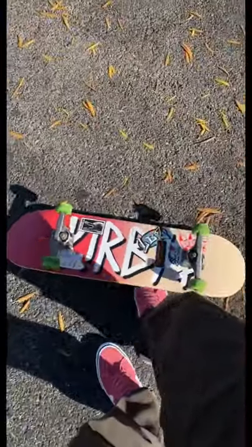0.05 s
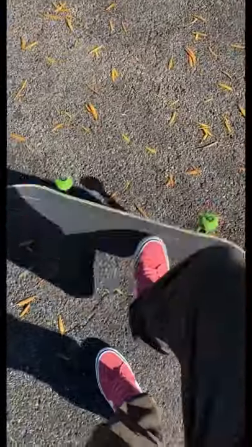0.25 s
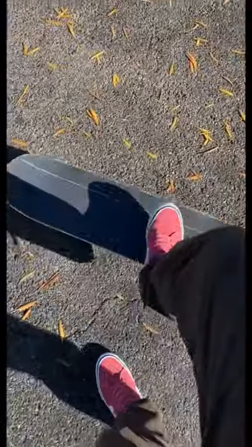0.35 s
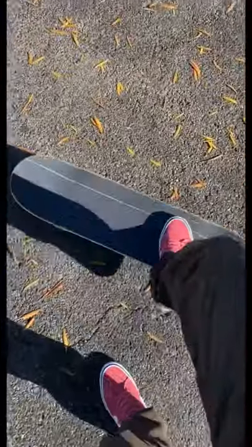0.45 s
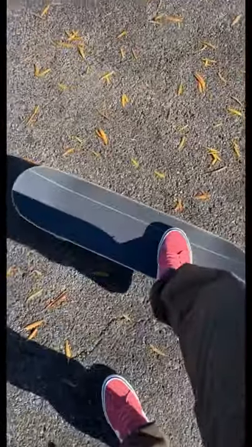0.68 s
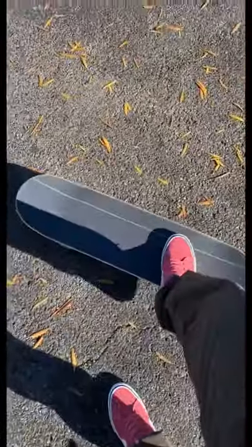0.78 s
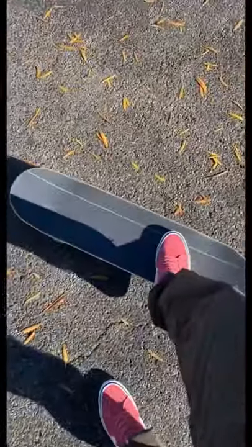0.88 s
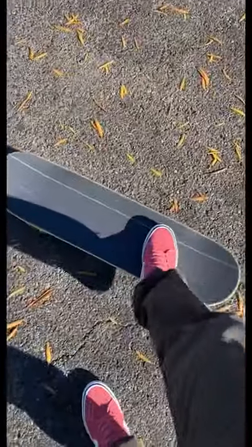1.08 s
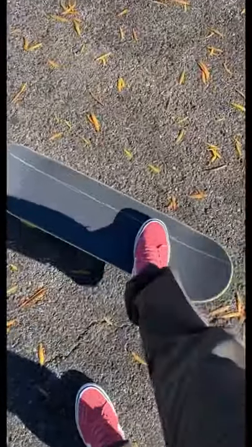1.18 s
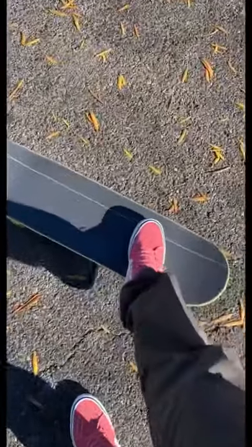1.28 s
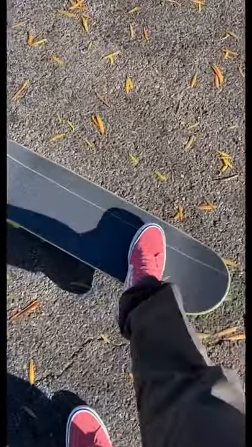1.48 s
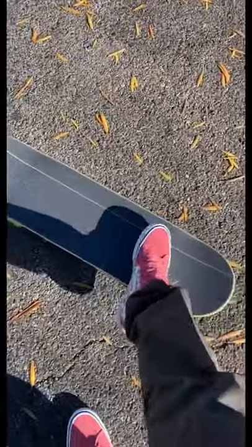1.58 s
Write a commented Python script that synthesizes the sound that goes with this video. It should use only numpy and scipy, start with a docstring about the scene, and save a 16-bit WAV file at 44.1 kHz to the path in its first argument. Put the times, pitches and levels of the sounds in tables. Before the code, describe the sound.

A skateboard lands a flip on asphalt with a loud wooden clatter, then creeps on.

```python
"""Outdoors on asphalt, a hand-held microphone close to a skateboard coming down from a flip.
A shoe scuffs the spinning deck, the wheels slap down, then the rider lands and the wooden board
clatters, loud enough for the gain control to duck everything for a moment. The board creeps on over
grit, its trucks clunking under the rider's weight. Throughout, light wind rumbles on the microphone
and, far off, an insect chirps faintly."""
import sys
import numpy as np
from scipy import signal
from scipy.fft import rfft, irfft
from scipy.io import wavfile
from scipy.ndimage import uniform_filter1d, minimum_filter1d

SR = 44100
rng = np.random.default_rng(int(sys.argv[2]) if len(sys.argv) > 2 else 0)


def pcm_store(signal):
    """Save signal as 16-bit PCM."""
    levels = np.round(np.clip(np.atleast_2d(signal), -1, 1) * 32767)
    wavfile.write(sys.argv[1], SR, levels.astype(np.int16).T)


N = 72765

# blows on the board (time [s], level [dB], knock pitch [Hz], brightness [dB/octave],
# ring length [factor], tick [dB], thump [dB], clack [dB]); the last three are relative to the level
BLOWS = [(0.083, -22.5, 664, 9.5, 1.18, -11, -4, -12), (0.090, -22, 570, -2, 1.8, -19, -26, -27),
         (0.128, -21.5, 570, -7, 1.15, -16, -1, 3.5), (0.1548, -32.5, 1900, 13, 1.06, -4, -13, 3),
         (0.2385, -10, 1170, -3.5, 1.58, -10.5, -5.5, -20), (0.2404, -10, 622, 5.5, 1.19, -8, 7.5, -8),
         (0.244, -16.5, 1235, 2.5, 0.8, -36, 13, -26), (0.319, -23, 615, 3, 1.96, -42, 6.5, -29),
         (0.354, -15.5, 764, 2, 0.95, -30, -9, -19), (0.3608, -13, 515, -9, 1.2, -27, -24, -14),
         (0.374, -15, 550, -3, 0.78, -21, -16, -15), (0.3942, 4.5, 646, -7, 1.04, -27, -15, -23),
         (0.3973, 5.5, 938, 0.5, 1.1, -42, 0.5, -17), (0.4058, 11.5, 514, -2.5, 1.1, -43, -9, -12.5),
         (0.4219, 4, 620, 2.5, 1.9, -24.5, -5, -9.5), (0.4466, 9, 612, -3, 0.93, -38, -6, -15),
         (0.4569, -0.5, 727, 7, 0.66, -40, -17, -5), (0.469, -2, 580, 1, 1.65, -41, -11, -10.5),
         (0.4835, 1.5, 627, 4, 1.1, -43, -7, -14), (0.489, 3, 558, 0.5, 0.81, -37, -27, -12),
         (0.4938, -4.5, 830, -13.5, 0.64, -30, 13, -11), (0.506, 3.5, 614, 1, 0.73, -20, 7.5, -11.5),
         (0.5638, -6, 596, -3, 0.6, -21.5, -5, -1), (0.5939, -17, 615, -0.5, 1.04, -26, -24, -6.5)]
# ringing of the wooden deck and its trucks (frequency [Hz], level [dB], base t60 [s])
DECK_MODES = [(272.3, -18.5, 0.13), (319, -22, 0.06), (469, -14.5, 0.081), (529, -13.5, 0.062),
              (585.3, -7, 0.048), (622, -12.5, 0.065), (699, -8, 0.059), (866, -14, 0.064),
              (1009, -10.5, 0.048), (1141, -9, 0.034), (1230, -20, 0.015), (1524, -16.5, 0.045),
              (2062, -25, 0.045), (2876, -35, 0.049)]
# metallic clack of the axles (frequency [Hz], level [dB], base t60 [s])
AXLE_MODES = [(1118, -0.5, 0.038), (1254, 1.5, 0.017), (2795, -2.5, 0.013)]
# dense rattle of wood and hardware (frequency [Hz], relative level [dB])
RATTLE_SPECTRUM = [(60, -19), (220, -15), (390, -16), (600, -14), (900, -9), (1200, 3.5), (2000, -3),
                   (3000, -20), (3500, -30), (10000, -28.5), (16000, -68)]
# hard contact with the asphalt (frequency [Hz], relative level [dB])
TICK_SPECTRUM = [(300, 12.5), (2000, 9), (3700, -6), (6000, -2.5), (9000, -4), (10800, -1.5), (12500, -30),
                 (16000, -32)]
# wheels and deck grinding over grit (time [s], level [dB])
ROLL_LEVEL = [(0, -56), (0.06, -42), (0.09, -29), (0.15, -35), (0.21, -51.5), (0.275, -28), (0.38, -37.5),
              (0.50, -13.5), (0.535, -73), (0.62, -32.5), (0.70, -53), (0.93, -52), (1.08, -42),
              (1.24, -41.5), (1.39, -50), (1.46, -66), (1.65, -80)]
# trucks clunking as the rider's weight shifts (time [s], level [dB], brightness [dB/octave])
TRUCK_CLUNKS = [(0.687, -30.5, 6.5), (0.998, -28.5, 6), (1.0823, -31, -1), (1.1144, -21, -0.5),
                (1.118, -23.5, -18), (1.130, -22, 0), (1.183, -23, -14), (1.2125, -23, -17),
                (1.2235, -23, 9), (1.305, -25, -4), (1.336, -28.5, 0), (1.375, -29, -7), (1.384, -24.5, 1),
                (1.405, -25.5, -33)]
# ringing of the loaded trucks (frequency [Hz], level [dB], base t60 [s])
TRUCK_MODES = [(601, 5, 0.042), (682, -4.5, 0.085), (1038, -14, 0.059), (1196, -6, 0.036)]
# bits of grit snapping (time [s], level [dB])
GRIT_SNAPS = [(0.102, -39), (0.1575, -41), (0.1775, -39), (0.3934, -16), (0.4058, -15), (0.4265, -23),
              (0.494, -22), (0.5637, -29), (1.0823, -34)]
# the crack of one bit of grit (frequency [Hz], relative level [dB])
SNAP_SPECTRUM = [(400, 4.5), (3000, -16), (4500, -1.5), (7500, -4), (11000, 1.5), (12500, -33),
                 (16000, -15)]
# rasp of shoes on grip tape, then a faint, high hiss as the board rolls on (time [s], level [dB])
RASP_LEVEL = [(0, -79), (0.061, -67), (0.086, -51), (0.136, -55), (0.21, -71), (0.255, -52), (0.32, -75),
              (0.385, -52), (0.405, -30), (0.45, -35.5), (0.50, -33), (0.535, -55), (0.67, -60),
              (0.89, -55.5), (1.06, -63.5), (1.65, -65)]
# colour of that rasp and high hiss (frequency [Hz], relative level [dB])
RASP_SPECTRUM = [(1000, 6), (3700, -3.5), (7000, -9), (11200, -4), (12500, -11), (15000, -18), (16500, -15)]
# wind on the microphone (frequency [Hz], relative level [dB])
WIND_SPECTRUM = [(15, -20), (30, -25), (55, -8), (78, 2), (110, -1), (160, -8.5), (205, -14.5),
                 (265, -15.5), (350, -17.5), (700, -96), (3000, -91)]
# strength of the gusts (time [s], level [dB])
WIND_LEVEL = [(0, -37), (0.2, -34), (0.35, -40), (0.47, -37), (0.65, -35), (0.78, -34.5), (0.95, -35.5),
              (1.1, -33.5), (1.3, -32.5), (1.52, -32), (1.65, -34.5)]
# distant outdoor hiss (frequency [Hz], relative level [dB])
HISS_SPECTRUM = [(30, 10), (300, 1.5), (700, 4.5), (1500, -4.5), (2500, -11.5), (4300, -23), (7500, -26.5),
                 (9400, -29.5), (11500, -38), (13000, -43), (16000, -48)]
# strength of that hiss (time [s], level [dB])
HISS_LEVEL = [(0, -37.5), (0.66, -38), (0.95, -40), (1.25, -41), (1.65, -41.5)]
# chirps of a distant insect (time [s], level [dB])
INSECT_CHIRPS = [(0.266, -60), (0.888, -60), (1.356, -60), (1.622, -59.5)]
# the insect's narrow, high band (frequency [Hz], relative level [dB])
CHIRP_SPECTRUM = [(7500, -50), (8700, -12), (9100, -10), (9500, -14), (10800, -55)]


def board_blow(db, knock_hz, tilt_db, ring, tick_db, thump_db, clack_db):
    """A blow, close up: dead wheel knock, ringing wood, axle clack, gritty tick, thump of deck flex."""
    t = np.arange(SR // 4) / SR
    knock_peak_s, thump_hz = 0.0024, 248
    swell = (t / knock_peak_s * np.exp(1 - t / knock_peak_s)) ** 2
    knock = amp(-2.5) * swell * np.sin(2 * np.pi * knock_hz * t)
    rattle = amp(-12.5 + tilt_db) * noise(RATTLE_SPECTRUM, len(t)) * fade(t, 0.035 * ring)
    # each blow lands on another spot and loads the deck differently
    struck = [(hz * (1 + 0.017 * rng.normal()), mode_db + 2.5 * rng.normal(), t60)
              for hz, mode_db, t60 in DECK_MODES]
    wood = (ringing(struck, t, tilt_db, ring) + rattle) * onset(t, rise_s=0.0019)
    clack = amp(clack_db) * ringing(AXLE_MODES, t, tilt_db=0, ring=0.66) * onset(t, rise_s=0.0016)
    tick_decay = fade(t, 0.011 * ring) + amp(-14.5) * fade(t, 0.081 * ring)
    tick = amp(tick_db) * grains(TICK_SPECTRUM, len(t), spread_db=6) * tick_decay
    thump_shape = fade(t, 0.025 * ring) * onset(t, rise_s=0.005)
    thump = amp(thump_db) * np.sin(2 * np.pi * thump_hz * t) * thump_shape
    return amp(db) * (knock + wood + clack + tick + thump)


def ringing(modes, t, tilt_db, ring):
    """A struck part rings for ring times its base t60; harder contact favours its high modes."""
    pivot_hz = 600
    return sum(amp(db + tilt_db * np.log2(hz / pivot_hz))
               * fade(t, t60 * ring) * np.sin(2 * np.pi * hz * t)
               for hz, db, t60 in modes)


def deck_antiresonance(x):
    """The deck radiates little between its low bending modes, so it sounds dry and woody."""
    dip_hz, width_hz, share = 385, 67, 0.94
    b, a = signal.iirnotch(dip_hz, dip_hz / width_hz, fs=SR)
    return (1 - share) * x + share * signal.lfilter(b, a, x)


def rolling():
    """Grains of asphalt tap the board into ringing and crunch under it."""
    grains_per_s, spread_db = 1000, 3.5
    sizes = amp(spread_db * np.minimum(rng.exponential(1, N), 4))
    grit = sizes * rng.choice([-1., 1.], N) * (rng.random(N) < grains_per_s / SR)
    deck_tap = ringing(DECK_MODES, np.arange(SR // 4) / SR, tilt_db=3.0, ring=0.58)
    body = unit(signal.fftconvolve(grit, deck_tap)[:N])
    crunch = amp(-19) * colour(grit, TICK_SPECTRUM)
    return level(ROLL_LEVEL) * (body + crunch)


def truck_clunk(db, tilt_db):
    """A truck shifts on its cushions: a soft, hollow knock."""
    t = np.arange(SR // 4) / SR
    return amp(db) * ringing(TRUCK_MODES, t, tilt_db, ring=0.98) * onset(t, rise_s=0.002)


def grit_snap(db):
    """A bit of grit snaps against the board or under a wheel: a tiny, dry crack."""
    t = np.arange(2048) / SR
    return amp(db) * noise(SNAP_SPECTRUM, len(t)) * fade(t, t60=0.0071) * onset(t, rise_s=0.00041)


def rasp_and_hiss():
    """Grainy rasp of shoes on grip tape, then a faint, fine, high hiss as the board rolls on."""
    clumps_db = unit(uniform_filter1d(rng.standard_normal(N), size=120))
    rasp = grains(RASP_SPECTRUM, N, spread_db=30)
    return level(RASP_LEVEL) * unit(rasp * amp(clumps_db))


def echoes(x):
    """A thin, short scatter reaches the microphone from the ground and surroundings."""
    t = np.arange(SR // 2) / SR
    echoes_per_s, delay_s, echo_db = 2000, 0.006, -14.5
    taps = rng.standard_normal(len(t)) * (rng.random(len(t)) < echoes_per_s / SR)
    taps *= fade(t, t60=0.097) * (t > delay_s)
    return amp(echo_db) * signal.fftconvolve(x, taps / np.linalg.norm(taps))[:N]


def open_air():
    """Low wind buffets the microphone over a soft, distant hiss."""
    wind = level(WIND_LEVEL) * noise(WIND_SPECTRUM, N)
    hiss = level(HISS_LEVEL) * noise(HISS_SPECTRUM, N)
    return wind + hiss


def insect_chirp(db):
    """An insect far off: a short, blurred trill of thin, high pulses."""
    length_s, pulses_per_s, depth = 0.091, 60, 0.54
    t = np.arange(0, length_s, 1 / SR)
    throb = 1 - depth * np.cos(np.pi * pulses_per_s * t) ** 2
    arch = np.sin(np.pi * t / length_s) ** 0.19
    return amp(db) * noise(CHIRP_SPECTRUM, SR // 4)[:len(t)] * throb * arch


def amp(db):
    """Decibels to gain."""
    return 10 ** (np.asarray(db) / 20)


def unit(x):
    """Scales to rms 1."""
    return x / np.sqrt(np.mean(x ** 2) + 1e-20)


def level(points):
    """A (time [s], level [dB]) curve as a gain for every sample."""
    return amp(np.interp(np.arange(N) / SR, *np.transpose(points)))


def colour(x, spectrum):
    """Shapes x by a (frequency [Hz], level [dB]) spectrum, at rms 1."""
    hz, db = np.transpose(spectrum)
    bin_hz = np.fft.rfftfreq(len(x), 1 / SR)
    gain = amp(np.interp(np.log(bin_hz + 1), np.log(hz), db))
    return unit(irfft(rfft(x) * gain, len(x)))


def noise(spectrum, size):
    """Smooth noise with the given spectrum."""
    return colour(rng.standard_normal(size), spectrum)


def grains(spectrum, size, spread_db):
    """Noise made of grains of uneven size."""
    return colour(rng.standard_normal(size) * amp(spread_db * rng.uniform(-0.64, 1, size)), spectrum)


def onset(t, rise_s):
    """Builds up from silence with time constant rise_s."""
    return 1 - np.exp(-t / rise_s)


def fade(t, t60):
    """Falls by 60 dB in t60 seconds."""
    return np.exp(-np.log(1000) * t / max(t60, 1e-4))


def add(mix, s, sound):
    """Mixes a sound in at time s."""
    part = mix[max(round(s * SR), 0):][:len(sound)]
    part += sound[:len(part)]


def scene():
    """At the microphone, in mono: the board close by, its echoes, and the open air behind."""
    board = rolling() + rasp_and_hiss()
    background = open_air()
    for s, *blow in BLOWS:
        add(board, s, board_blow(*blow))
    for s, db, tilt_db in TRUCK_CLUNKS:
        add(board, s, truck_clunk(db, tilt_db))
    for s, db in GRIT_SNAPS:
        add(board, s, grit_snap(db))
    for s, db in INSECT_CHIRPS:
        add(background, s, insect_chirp(db))
    board = deck_antiresonance(board)
    return (board + echoes(board) + background)[None]


def record(dry, threshold_db=-1.0, hold_s=0.11, recover_db_per_s=115, attack_s=0.00025):
    """Gain control drops fast on loud peaks, holds and recovers; then soft clipping and a low-pass."""
    over_db = np.maximum(20 * np.log10(abs(dry[0]) + 1e-9) - threshold_db, 0)
    half_hold = int(hold_s * SR / 2)
    held_db = -minimum_filter1d(-over_db, 2 * half_hold + 1, origin=half_hold, mode="constant")
    recovery_db = recover_db_per_s * np.arange(N) / SR
    duck_db = np.maximum.accumulate(held_db + recovery_db) - recovery_db
    pole = np.exp(-1 / (attack_s * SR))
    ducked = dry * amp(-signal.lfilter([1 - pole], [1, -pole], duck_db))
    rounded = ducked / (1 + ducked ** 4) ** .25
    lowpass = signal.firwin(511, cutoff=16200, window=("kaiser", 9), fs=SR)
    return signal.oaconvolve(rounded, lowpass[None], "same")


dry = scene()
out = record(dry)
pcm_store(out)
```